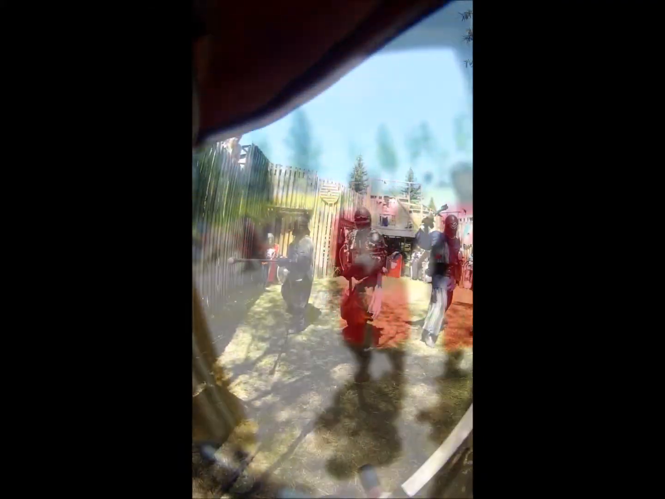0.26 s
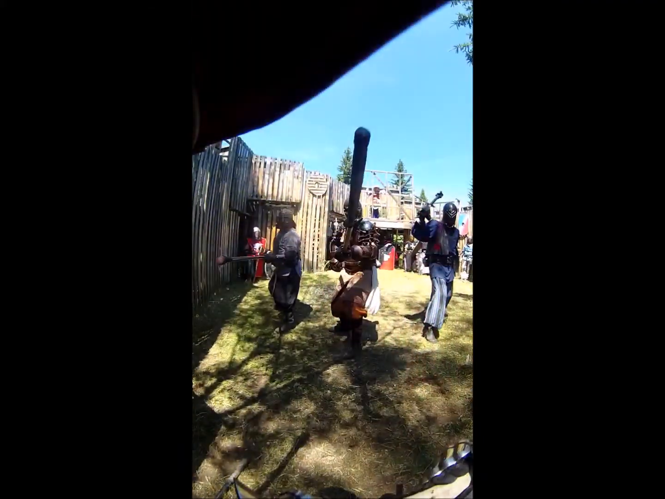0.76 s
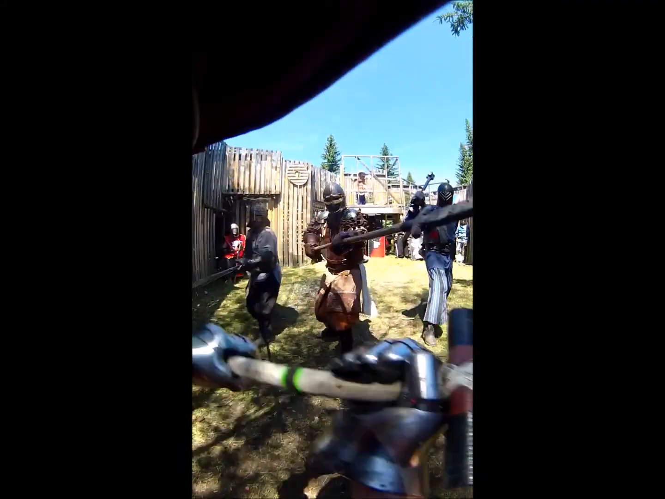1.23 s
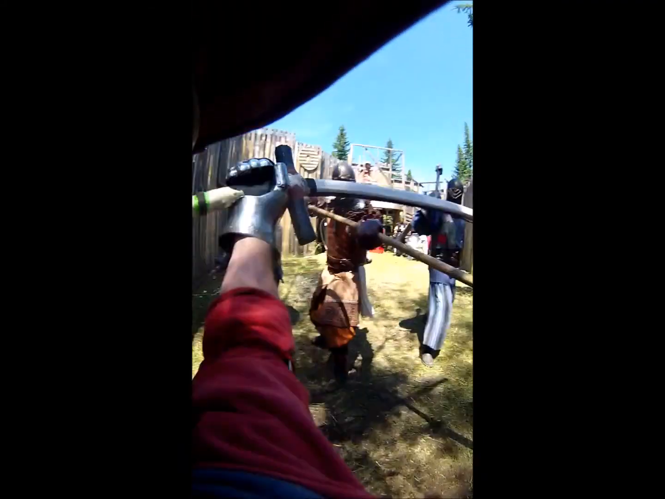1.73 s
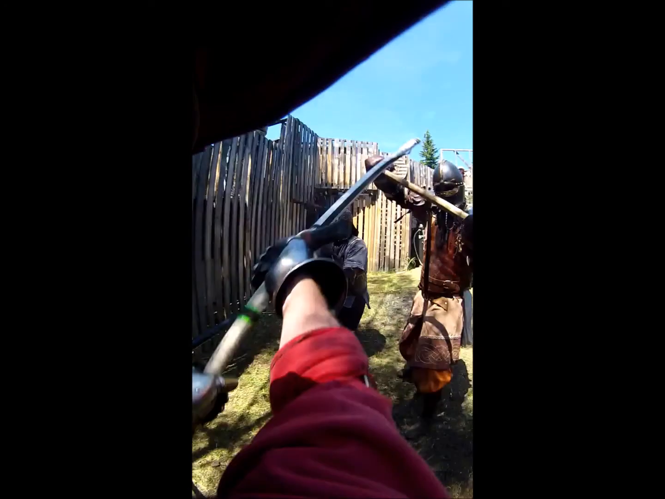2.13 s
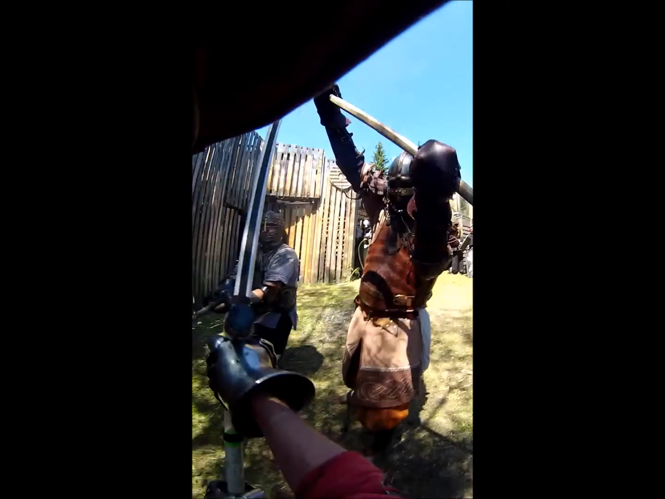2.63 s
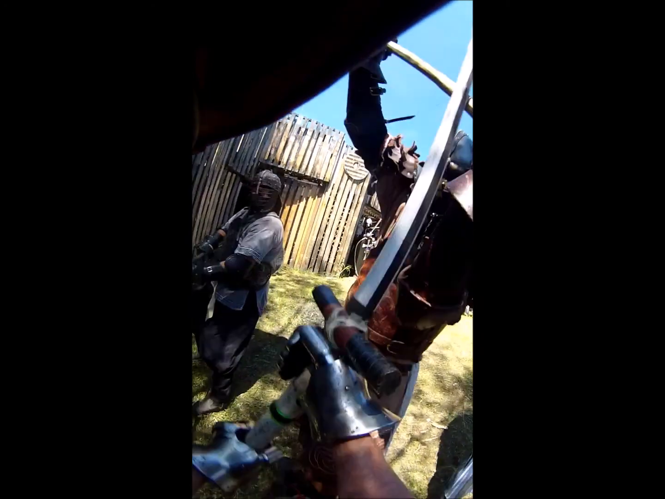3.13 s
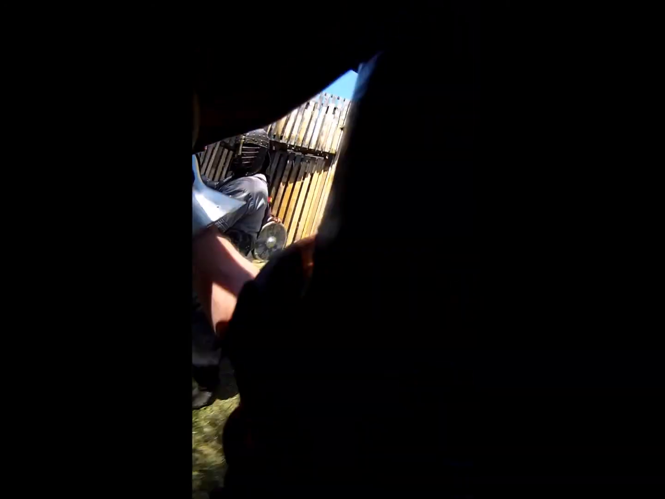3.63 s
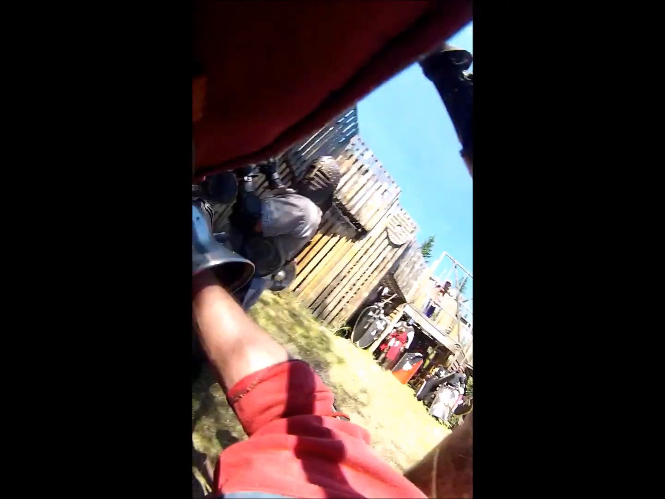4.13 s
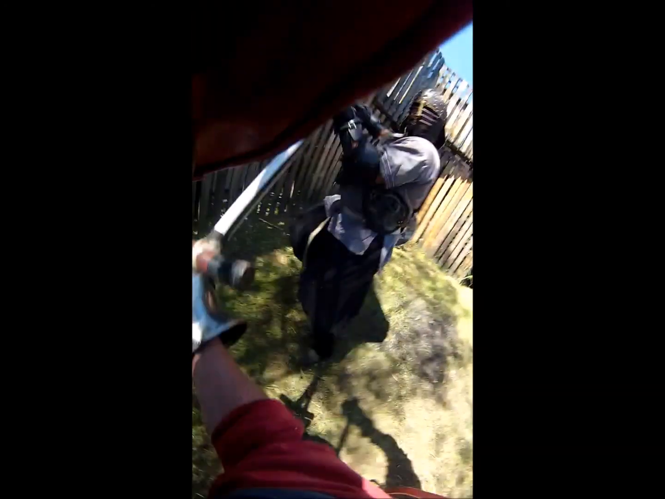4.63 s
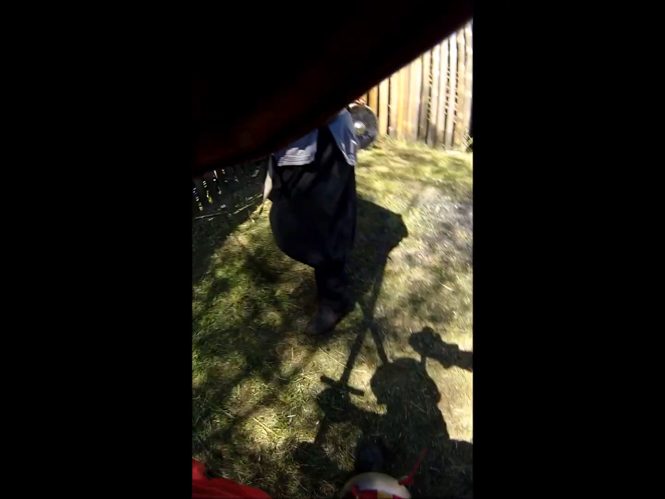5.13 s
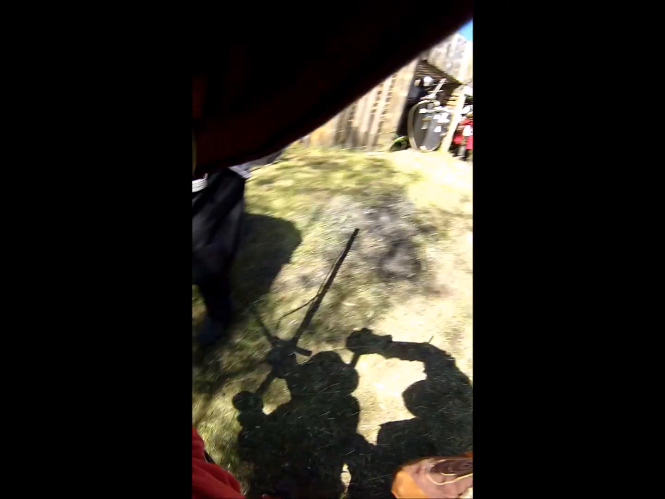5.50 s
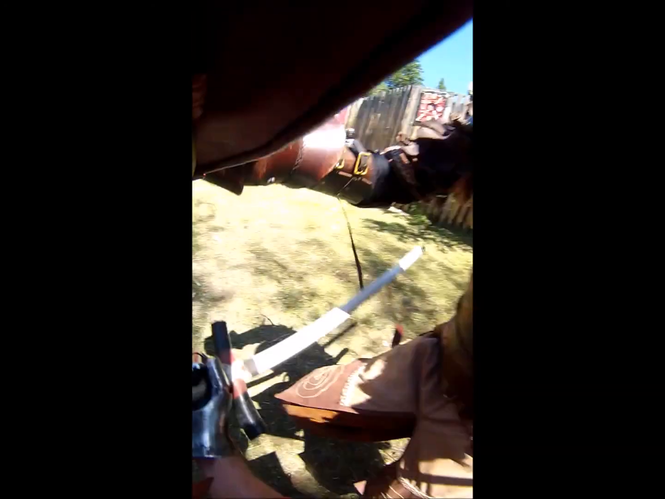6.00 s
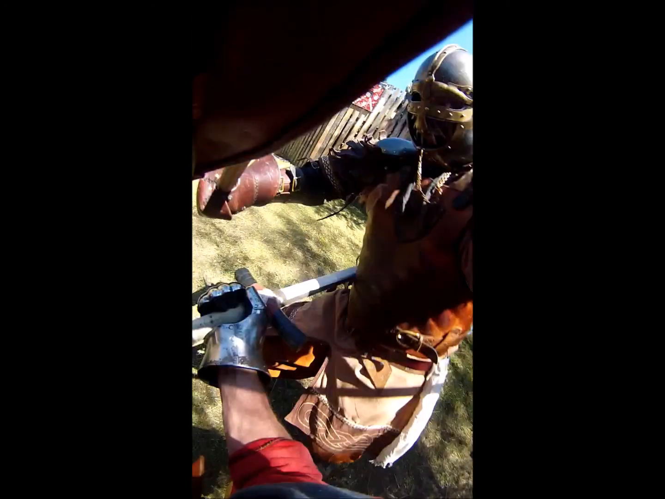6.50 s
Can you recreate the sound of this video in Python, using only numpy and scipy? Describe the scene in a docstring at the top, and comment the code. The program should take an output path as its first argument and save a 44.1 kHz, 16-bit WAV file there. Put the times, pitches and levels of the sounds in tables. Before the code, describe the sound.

Outdoors beside a timber palisade, a helmet microphone catches rapid cane clacks on armour amid wind and rubbing gear. Before one second everything slows to quarter speed, two octaves lower. Sparse deep knocks follow, then a cluster of heavy thuds and rattling harness. A low buzzing hum runs beneath and fades out midway. The sound is gritty, overloaded and coarse.

```python
"""Armoured cane fight by a palisade

Fighters trade cane blows beside a timber palisade, heard from a helmet camera. Cracks, rings and thuds
echo over wind, rubbing gear, low moans and a buzzing hum that fades out midway, built from noise and sines.
The camera saturates and holds each coarse sample, which mirrors the spectrum; after a moment the playback
drops to quarter speed: blows, gear, wind noise and hum sound two octaves lower.
"""
import sys
import numpy as np
from scipy import signal
from scipy.fft import rfft, irfft, next_fast_len
from scipy.io import wavfile
from scipy.ndimage import uniform_filter1d, map_coordinates

SR = 44100
rng = np.random.default_rng(int(sys.argv[2]) if len(sys.argv) > 2 else 0)


def inscribe(sig):
    """Save sig as 16-bit PCM at rate SR to the path in sys.argv[1].

    A 1-D sig is mono; a 2-D sig holds one channel per row.
    Samples are clipped to [-1, 1] before scaling.
    """
    pcm = np.round(np.clip(np.atleast_2d(sig).T, -1, 1) * 32767)
    wavfile.write(sys.argv[1], SR, pcm.astype(np.int16))


def voltage_ratio(decibels):
    """Convert decibels (scalar or array-like) to amplitude ratios, 20 dB per decade."""
    exponent = np.asarray(decibels, float) / 20
    return 10 ** exponent


N = 298020
TIME = np.arange(N) / SR  # s
CUT_S, SLOW = 0.7648, 1 / 4  # when the playback slows, and to what share of full speed
RATE_HZ, TOP_HZ = 12000, 15450  # coarse sample rate and top of the mirrored band, at full speed

# Cane on plate or cane, bright: (time [s], level [dB], ring at full speed [Hz], contact [s])
CLACK_HITS = [(0.041, -21.5, 2413, .0058), (.314, -13.5, 3200, .007), (0.364, -15, 3178, 0.0059),
              (0.477, -16.5, 4997, .0027), (.599, -5, 3980, 0.016), (0.631, -12.5, 5060, 0.0042),
              (0.686, -13, 5050, 0.0027), (0.919, -19, 4730, 0.005), (1.657, -4.5, 4853, 0.011),
              (1.677, -3.5, 4890, 0.0091), (1.709, -17, 4590, 0.0088), (1.732, -17, 4840, 0.019),
              (2.068, -28, 4950, .01), (2.176, -30, 5020, .014), (2.205, -17, 4190, 0.008),
              (2.217, -20, 4800, .012), (3.12, -2, 3296, 0.0037), (3.255, -17, 5100, 0.012),
              (3.975, -31, 4330, 0.0038), (4.014, -10.5, 4940, .008), (4.051, -11, 4360, 0.0075),
              (4.073, -12.5, 4420, .003), (4.233, -17.5, 3260, 0.002), (4.769, -6, 5145, 0.021),
              (4.832, -14, 2924, .004), (5.108, -24.5, 5670, 0.0082), (5.351, -11.5, 4430, 0.012),
              (6.345, -9.5, 2472, 0.03)]
# Cane on shield or padded body, heavy:
# (time [s], level [dB], thud re that level [dB], settled thud pitch at full speed [Hz], contact [s])
THUMP_HITS = [(.075, -35.5, 9.5, 643, .012), (.304, -21.5, 6.5, 680, .007), (.303, -30.5, 11.5, 430, 0.05),
              (1.635, -18.5, -3, 527, 0.012), (3.122, -21, 11, 1053, .013), (3.382, -22, 3.5, 297.4, 0.01),
              (3.393, -24.5, 15, 416, .017), (3.737, -12.5, -5.5, 874, 0.024), (3.74, -33, 22, 178, .021),
              (3.913, -45.5, 19.5, 736, 0.016), (4.136, -15.5, 9.5, 1300, 0.011),
              (4.194, -21.5, 0, 395, 0.005), (4.48, -38.5, 16.5, 693, .031),
              (4.518, -26.5, 7.5, 332.5, 0.015), (4.54, -26, 8.5, 618, 0.011),
              (4.661, -12, -4, 1700, 0.0051), (4.668, -26.5, 10, 1900, .005), (4.768, -16, 7, 1071, 0.028),
              (4.775, -18.5, 9.5, 234.8, 0.011), (5.065, -29.5, 13, 932, 0.014),
              (5.348, -22, 6.5, 1137, .022), (6.344, -15.5, 3.5, 505, 0.011), (6.361, -17, 10, 840, .024),
              (6.35, -37.5, 18.5, 260, .045)]
# Splash of cane on plate: (frequency at full speed [Hz], density [dB per Hz])
CRACK_COLOUR = [(1000, -11.5), (2000, 1), (3400, -3.5), (4700, 2.5), (5300, 1), (5900, -16.5)]
# The palisade's echo: (frequency at full speed [Hz], t60 at full speed [s])
FENCE_DECAY = [(400, 0.19), (1200, 0.032), (5000, 0.11)]
# A shaft dragged along a plate edge: (time [s], length [s], first level [dB], last level [dB])
SCRAPE_STROKES = [(3.972, 0.072, -33.5, -20), (4.05, 0.09, -19.5, -29)]
# The scraped plate: (frequency at full speed [Hz], density [dB per Hz])
PLATE_COLOUR = [(1200, -19), (2000, -15), (2700, 3), (3400, -15), (4300, 1.5), (5100, 2), (5900, -21.5)]
# Harness shaken by a blow: (time [s], level [dB], t60 as heard [s])
HARNESS_SHAKES = [(0.307, -23.5, 0.17), (.6, -16.5, 0.13), (1.68, -25.5, 0.22), (3.748, -22, 0.27),
                  (4.669, -22, 0.16), (4.799, -21, 0.53), (5.075, -26, 0.65), (5.366, -19, 0.46),
                  (6.391, -18.5, 0.25)]
# How hard the wearer moves: (time [s], rub level [dB])
WEARER_EFFORT = [(0, -37), (0.257, -44), (0.308, -42), (0.586, -34), (0.648, -25.5), (.767, -24.5),
                 (.78, -57.5), (0.958, -39.5), (1.558, -41), (1.761, -56.5), (1.921, -39.5), (2.06, -40.5),
                 (3.261, -42), (3.79, -51), (3.97, -45), (4.119, -35.5), (4.31, -44.5), (4.537, -54),
                 (4.68, -33), (5.09, -43), (5.34, -37), (5.54, -54), (5.789, -43), (6.111, -30.5),
                 (6.499, -30.5), (6.76, -48.5)]
# The wider fight blurs into a hiss that falls away: (time [s], level [dB])
MELEE_LEVEL = [(0, -39), (0.758, -41), (0.788, -38.5), (0.962, -45.5), (1.501, -41.5), (1.762, -43),
               (2.063, -48), (2.622, -39.5), (2.909, -42), (3.501, -47.5), (4.101, -57.5), (4.299, -73.5)]
# Rubbing cloth and gear: (frequency at full speed [Hz], density [dB per Hz])
RUB_COLOUR = [(300, -6.5), (620, -2.5), (800, 3.5), (1050, 2), (1350, 2), (1700, -0.5), (2100, -21),
              (4000, -47.5)]
# Rasping plates after the slow-down: (frequency at full speed [Hz], density [dB per Hz])
RASP_SLOW_COLOUR = [(900, -26.5), (2000, -1), (3400, -7), (4400, 2.5), (5000, 3), (5250, -21.5),
                    (5900, -19)]
# Duller rasp before the slow-down: (frequency [Hz], density [dB per Hz])
RASP_FULL_COLOUR = [(900, -23), (2000, 0.5), (2800, -0.5), (4200, -0.5), (5000, -10.5), (5800, -14.5)]
# Modes of shell and plates when rubbed: (frequency at full speed [Hz], width at full speed [Hz], gain [dB])
HELMET_MODES = [(754, 84, -2), (924, 32, 2.5), (1083, 55, 6), (1629, 67.5, 0.5), (2673, 55, 14.5)]
# Rumble of the helmet mount: (frequency at full speed [Hz], density [dB per Hz])
MOUNT_COLOUR = [(150, -25.5), (240, 1.5), (420, 8.5), (620, -23)]
# Wind on the port: (time [s], level [dB])
WIND_GUSTS = [(0, -23), (.1, -23.5), (.26, -28.5), (.31, -16), (.4, -25.5), (.52, -20.5), (.62, -27),
              (.77, -30), (.96, -34.5), (1.22, -31), (1.7, -35), (1.92, -32), (2.06, -35.5), (2.41, -28.5),
              (2.62, -40.5), (2.91, -29.5), (3.26, -37), (4.12, -36), (4.31, -42.5), (4.92, -48.5),
              (5.54, -56.5), (6.11, -38), (6.52, -54), (6.76, -69)]
# Wind noise: (frequency at full speed [Hz], density [dB per Hz])
WIND_COLOUR = [(40, -2.5), (80, 5.5), (130, 1.5), (300, -6), (600, -13), (1200, -40), (3000, -64.5)]
# Air moaning past the helmet: (time [s], length [s], first pitch [Hz], last pitch [Hz], level [dB]), as heard
MOAN_GLIDES = [(0, .13, 182, 160.3, -25), (0.479, .09, 110, 95, -21), (0.902, .42, 182, 133, -36.5),
               (2.991, .12, 102, 98, -35), (5.879, .46, 62, 94.8, -35)]
# The hum: (time [s], pitch at full speed [Hz], level [dB], upper overtones re usual [dB])
HUM_COURSE = [(0, 133, -29, -1.5), (0.758, 133.2, -32, 1), (0.78, 134.9, -36, 1.5), (1.201, 135.7, -31, -1),
              (1.623, 135.6, -33, 5.5), (1.753, 134, -48, -2), (2.152, 136.1, -47, -2),
              (2.25, 136.3, -38, -2), (2.55, 136.5, -37.5, 7.5), (2.799, 137.6, -45, 7),
              (3.097, 136.7, -43, -1.5), (3.4, 136.6, -61.5, -1)]
# Hum overtones before the slow-down: (multiple of the pitch [-], level [dB])
BUZZ_BEFORE = [(3, -8.5), (6, -16.5), (9, -9), (10, -16), (11, -17.5), (12, -11), (14, -3), (16, -16.5),
               (28, -18), (30, -19.5), (31, -14.5), (34, -13), (35, -24), (38, -14)]
# Hum overtones after the slow-down: (multiple of the pitch [-], level [dB])
BUZZ_AFTER = [(6, -11), (8, -6), (10, 5.5), (11, -4), (12, -3), (14, 5.5), (27, -8), (29, -16.5), (30, -6),
              (31, -17), (33, -6), (34, -2), (36, -9), (38, -10)]

CLACK_THUD_DB, CLACK_THUD_HZ = -25.5, 1160  # every clack's faint thud, at full speed
RING_HZ, RING_DROP_HZ_PER_DB = 3945, 110  # the more a thump thuds, the lower its cane rings
CLACK_CHATTER, THUMP_CHATTER = 0.069, 0.28  # random phase step of the ring at full speed, rad per sample
DROOP_DB = 5.5  # what the crack loses while the contact lasts
LOWER_RING, LOWER_RING_DB = 0.72, -12.5  # the cane's second mode, re the first
UPPER_THUD, UPPER_THUD_DB = 1.45, -8  # the struck panel's second mode, re the first
USUAL_DB = -42  # usual rub level, at which the two offsets below apply
RASP_DB, RASP_GROWS = -12, 1.497  # rasp re usual rub [dB], and its rise per dB of effort
MOUNT_DB, MOUNT_GROWS = -7, 1.1  # mount rumble re usual rub [dB], and its rise per dB of effort


def along(points, hz):
    """Reads (frequency, value) points on a log-frequency axis."""
    f, v = np.transpose(points)
    return np.interp(np.log(hz + 1), np.log(f + 1), v)


def course(points):
    """Draws (time, value) points as a curve over the scene."""
    return np.interp(TIME, *np.transpose(points))


def unit(x):
    """Scales a sound to rms 1."""
    return x / np.sqrt(np.mean(x ** 2) + 1e-20)


def filtered(x, response):
    """Shapes the spectrum of x by a response of frequency."""
    m = next_fast_len(len(x) + 8192)
    return irfft(rfft(x, m) * response(np.fft.rfftfreq(m, 1 / SR)), m)[:len(x)]


def noise(size, colour, speed):
    """Coloured noise of rms 1, its colour lowered by the playback speed."""
    white = rng.standard_normal(size)
    return unit(filtered(white, lambda hz: voltage_ratio(along(colour, hz / speed))))


def wobble(rate):
    """A smooth random curve with `rate` knots a second."""
    return map_coordinates(rng.standard_normal(int(N * rate / SR) + 4), [TIME * rate])


def patchy(x, patchy_db):
    """Makes small patches of frequency and time louder or fainter at random."""
    z = signal.stft(x, nperseg=1024)[2]
    field = uniform_filter1d(rng.standard_normal(z.shape), size=4, axis=0)
    field = uniform_filter1d(field, size=8, axis=1)
    return signal.istft(z * voltage_ratio(patchy_db * unit(field)), nperseg=1024)[1][:len(x)]


def splice(full, slow):
    """Crossfades in 1 ms from the full-speed to the slowed sound."""
    share = np.clip((TIME - CUT_S) / 0.001, 0, 1)
    return (1 - share) * full + share * slow


def contacts(speed):
    """Lists time, level, thud level and pitch, ring, contact and chatter of the blows at this speed."""
    rows = []
    for s, db, ring_hz, contact in CLACK_HITS:
        rows.append((s, db, CLACK_THUD_DB, CLACK_THUD_HZ, ring_hz, contact, CLACK_CHATTER))
    for s, db, thud_db, thud_hz, contact in THUMP_HITS:
        ring_hz = RING_HZ - RING_DROP_HZ_PER_DB * thud_db
        rows.append((s, db, thud_db, thud_hz, ring_hz, contact, THUMP_CHATTER))
    return [row for row in rows if (row[0] > CUT_S) == (speed == SLOW)]


def cane_ring(t, ring_hz, chatter, speed):
    """Two cane modes, roughened by a phase that slips at random."""
    slips = chatter * np.cumsum(rng.standard_normal(len(t))) * np.sqrt(speed)
    phase = 2 * np.pi * ring_hz * speed * t + slips
    modes = np.sin(phase) + voltage_ratio(LOWER_RING_DB) * np.sin(LOWER_RING * phase)
    return filtered(modes, lambda hz: hz < RATE_HZ * speed / 2)


def panel_thud(t, thud_hz, speed):
    """A struck panel starts tight and slackens, so its two modes sag in pitch under some noise."""
    sag = 1 + 0.79 * np.exp(-t * speed / 0.00072)
    phase = 2 * np.pi * thud_hz * speed * np.cumsum(sag) / SR
    drum = np.sin(phase) + voltage_ratio(UPPER_THUD_DB) * np.sin(UPPER_THUD * phase)
    onset = 1 - np.exp(-t * speed / 0.00025)
    return onset * (drum + 0.26 * noise(len(t), RUB_COLOUR, speed))


def fence(x, speed):
    """The palisade answers with a fresh diffuse echo, each frequency dying at its own rate."""
    hz, t, z = signal.stft(rng.standard_normal(len(x)), SR, nperseg=512)
    decay = voltage_ratio(-60 * t * speed / along(FENCE_DECAY, hz / speed)[:, None])
    tail = signal.istft(z * decay, SR, nperseg=512)[1]
    return signal.fftconvolve(x, tail / np.linalg.norm(tail))[:len(x)]


def blows(speed):
    """Each contact cracks, rings and thuds while it lasts, then dies away into the palisade's echo."""
    out, t = np.zeros(N + SR), np.arange(SR // 2) / SR
    for s, db, thud_db, thud_hz, ring_hz, contact, chatter in contacts(speed):
        rise = 1 - np.exp(-t / (0.061 * contact))  # long contacts build up slowly
        splash = voltage_ratio(-4 + 0.33 * thud_db) * noise(len(t), CRACK_COLOUR, speed)  # heavy blows splash more
        crack = splash + voltage_ratio(-6.5) * cane_ring(t, ring_hz, chatter, speed)
        snap = voltage_ratio(-8 - 60 * t * speed / 0.011)  # the first touch is hardest
        droop = voltage_ratio(-DROOP_DB * np.minimum(t / contact, 1))
        thud = voltage_ratio(thud_db) * panel_thud(t, thud_hz, speed)
        after = np.maximum(t - contact, 0) * speed
        fade = voltage_ratio(-60 * after / 0.006)
        hit = voltage_ratio(db) * rise * ((1 + snap) * droop * crack + thud) * fade
        out[round(s * SR):][:len(t)] += hit + voltage_ratio(-13.0) * fence(hit, speed)
    return out[:N]


def scrape():
    """A dragged shaft slips in quick uneven steps that excite the plate."""
    level = np.zeros(N)
    for s, length, first_db, last_db in SCRAPE_STROKES:
        level += voltage_ratio(np.interp(TIME, [s, s + length], [first_db, last_db], left=-120, right=-120))
    return level * unit(voltage_ratio(1.4 * wobble(180)) * noise(N, PLATE_COLOUR, SLOW))


def rubbed(speed):
    """Rubbing noise that favours the modes of shell and plates."""
    def modes(hz):
        gain = 1
        for mode_hz, width_hz, db in HELMET_MODES:
            gain = gain + voltage_ratio(db) / (1 + (2 * (hz / speed - mode_hz) / width_hz) ** 2)
        return gain
    return unit(filtered(noise(N, RUB_COLOUR, speed), modes))


def rattle(speed):
    """Straps and plates jostle as unevenly pulsing rub and crack noise."""
    mix = rubbed(speed) + voltage_ratio(-6.0) * noise(N, CRACK_COLOUR, speed)
    return unit(voltage_ratio(0.99 * wobble(300 * speed)) * mix)


def shakes():
    """After a body blow straps and plates rattle on, ever weaker."""
    level = np.zeros(N)
    for s, db, t60 in HARNESS_SHAKES:
        level += (TIME > s) * voltage_ratio(db - 60 * np.abs(TIME - s) / t60)
    return level * splice(rattle(0.82), rattle(SLOW))  # already pitched a little low before the cut


def gear(speed, rasp_colour):
    """Cloth rubs and plates rasp in shared jerks; the wider fight's hiss swells the rasp."""
    rub_db = course(WEARER_EFFORT)
    plates_db = USUAL_DB + RASP_DB + RASP_GROWS * (rub_db - USUAL_DB)
    rasp_level = np.hypot(voltage_ratio(plates_db), voltage_ratio(course(MELEE_LEVEL)))
    jerks = wobble(160 * speed)
    rub = unit(voltage_ratio(0.58 * jerks) * patchy(rubbed(speed), patchy_db=3))
    grit = voltage_ratio(0.47 * jerks + 0.52 * wobble(500 * speed))
    rasp = unit(grit * patchy(noise(N, rasp_colour, speed), patchy_db=2.5))
    return voltage_ratio(rub_db) * rub + rasp_level * rasp


def mount(speed):
    """The helmet mount rumbles in lumps with the wearer's effort."""
    level_db = USUAL_DB + MOUNT_DB + MOUNT_GROWS * (course(WEARER_EFFORT) - USUAL_DB)
    return voltage_ratio(level_db) * unit(voltage_ratio(3.1 * wobble(40 * speed)) * noise(N, MOUNT_COLOUR, speed))


def wind(speed):
    """Wind buffets the port as low noise in lumps."""
    lumps = voltage_ratio(2.2 * wobble(60 * speed))
    return voltage_ratio(course(WIND_GUSTS)) * unit(lumps * noise(N, WIND_COLOUR, speed))


def moans():
    """Air swept past the helmet moans: each sine swells and fades while its unsteady pitch glides."""
    out = np.zeros(N)
    for s, length, first_hz, last_hz, db in MOAN_GLIDES:
        share = np.clip((TIME - s) / length, 0, 1)
        pitch_hz = (first_hz + (last_hz - first_hz) * share) * (1 + 0.03 * wobble(25))
        turns = np.cumsum(pitch_hz) / SR
        swell = np.sqrt(np.abs(np.sin(np.pi * share))) * (share < 1)
        out += voltage_ratio(db + 1.5 * wobble(30)) * swell * np.sin(2 * np.pi * turns)
    return out


def buzz(overtones, turns, upper_db):
    """Overtones loosely in step, so that they buzz, each wavering in level and phase."""
    out = np.zeros(N)
    for k, db in overtones:
        level = voltage_ratio(db + upper_db * (k > 20) + 2.5 * wobble(4))
        out += level * np.sin(2 * np.pi * (k * turns + rng.random() / 2 + wobble(10) / 14))
    return unit(out)


def hum():
    """A buzzing stack of overtones follows one pitch, falls two octaves at the cut and later stops."""
    s, pitch_hz, level_db, upper_db = np.transpose(HUM_COURSE)
    turns = np.cumsum(np.interp(TIME, s, pitch_hz) * np.where(TIME < CUT_S, 1, SLOW)) / SR
    upper_db = np.interp(TIME, s, upper_db)
    stack = splice(buzz(BUZZ_BEFORE, turns, upper_db), buzz(BUZZ_AFTER, turns, upper_db))
    return voltage_ratio(np.interp(TIME, s, level_db, right=-120)) * stack


def scene():
    """Joins the full-speed and slowed fight, then adds shakes, moans and hum."""
    full = blows(1) + gear(1, RASP_FULL_COLOUR) + mount(1) + wind(1)
    slow = blows(SLOW) + scrape() + gear(SLOW, RASP_SLOW_COLOUR) + mount(SLOW) + wind(SLOW)
    return (splice(full, slow) + shakes() + moans() + hum())[None]


def held(x, speed):
    """Holding each coarse sample for four ticks mirrors the band around the sample rate and nulls that rate."""
    size = 147 * (N // 147 + 1)  # a whole number of coarse samples
    rate = RATE_HZ * speed
    samples = map_coordinates(x, [np.arange(round(size * rate / SR)) * SR / rate])
    steps = signal.resample(np.repeat(samples, 4), size)[:N]
    return filtered(steps, lambda hz: hz < TOP_HZ * speed)


def ceiling(x, limit, hardness):
    """Bends peaks smoothly under a limit; more hardness makes a sharper knee."""
    return x / (1 + np.abs(x / limit) ** hardness) ** (1 / hardness)


def band_limit(x):
    """A steep low-pass at the top of the band."""
    return signal.sosfilt(signal.butter(12, 16340, fs=SR, output="sos"), x)


def record(dry):
    """The input saturates, is sampled coarsely and meets a second, higher ceiling with a sharper knee."""
    saturated = ceiling(dry[0], 0.46, 8)
    played = splice(held(saturated, 1), held(saturated, SLOW))
    played = ceiling(played, 0.66, 16)
    return band_limit(played[None])


dry = scene()
out = record(dry)
inscribe(out)
```